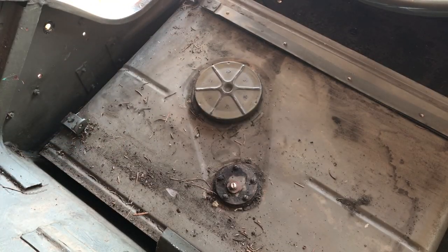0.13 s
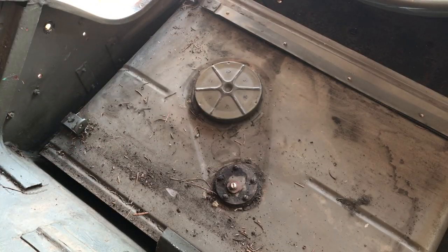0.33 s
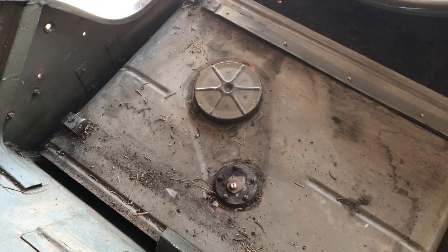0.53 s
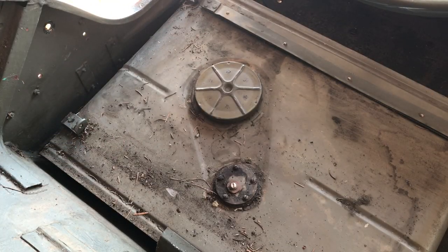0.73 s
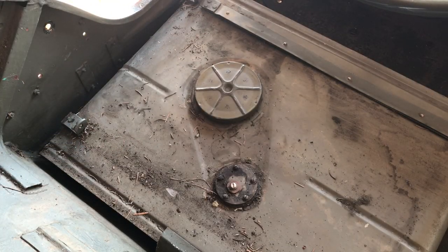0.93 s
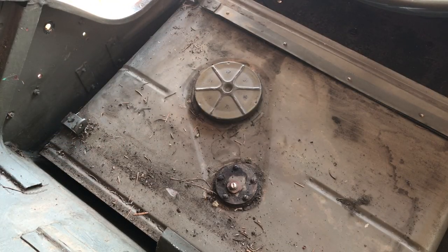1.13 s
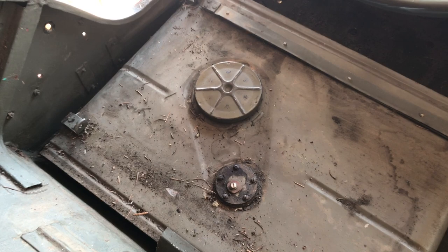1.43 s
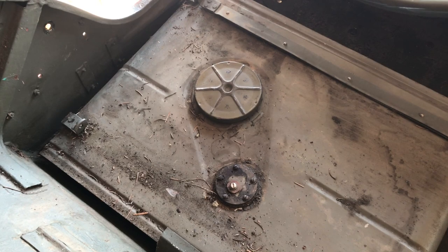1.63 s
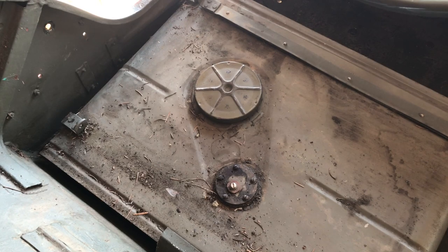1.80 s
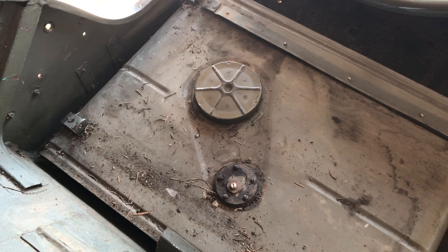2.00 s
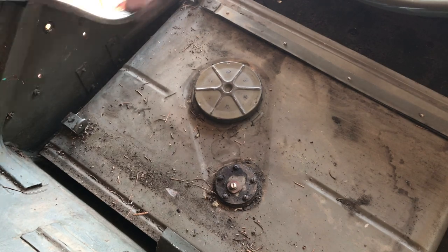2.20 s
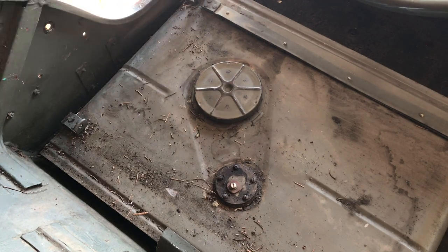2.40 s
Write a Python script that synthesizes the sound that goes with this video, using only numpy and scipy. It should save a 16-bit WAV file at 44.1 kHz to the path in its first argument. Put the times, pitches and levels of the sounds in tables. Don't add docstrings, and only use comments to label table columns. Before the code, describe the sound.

Steel strap knocks on a vehicle's sheet-metal body: near quiet, one sharp rattling clack, a soft low bump, a second clack, then a faint fading ring; close microphone in a quiet workshop with light hiss.

```python
import sys
import numpy as np
from scipy import signal
from scipy.fft import rfft, irfft
from scipy.io import wavfile
from scipy.ndimage import uniform_filter1d

SR = 44100
rng = np.random.default_rng(int(sys.argv[2]) if len(sys.argv) > 2 else 0)


def linear_from_db(decibels):
    return 10 ** (np.asarray(decibels, float) / 20)


def unload_audio(sound):
    columns = np.transpose(np.atleast_2d(sound))
    steps = np.round(np.clip(columns, -1, 1) * 32767)
    wavfile.write(sys.argv[1], SR, steps.astype(np.int16))


N = 112454

# frequency in Hz, level in dB per Hz.
RUMBLE_COLOUR = [(15, -84.5), (35, -84.5), (55, -92), (75, -80.5), (110, -87.5), (150, -108), (240, -114)]
# frequency in Hz, level in dB per Hz.
HISS_COLOUR = [(235, -122), (262, -100), (700, -102.5), (1500, -105.5), (4000, -108.5), (9000, -109.5),
               (15500, -110)]
# start in seconds, level in dB, pitch in Hz.
FLOOR_THUMPS = [
    (0.369, -63.5, 121),
    (.48, -67, 106),
    (0.671, -68, 110),
    (0.871, -63.5, 115),
    (0.969, -62, 114),
    (1.71, -56.5, 107),
    (1.809, -61, 109),
    (2.06, -62.5, 104),
    (2.339, -73, 132),
]

# start in seconds, level in dB, hardness in Hz.
FIRST_CONTACTS = [
    (1.066, -51, 1500),
    (1.0755, -19.5, 8070),
    (1.0795, -34, 6000),
    (1.088, -31, 1940),
    (1.103, -42.5, 1540),
    (1.116, -30.5, 1170),
    (1.13, -27.5, 1210),
    (1.143, -26, 980),
    (1.157, -36, 980),
]
BUMP_CONTACTS = [
    (1.268, -41.5, 900),
    (1.2745, -37, 1200),
    (1.288, -41, 774),
    (1.305, -40, 810),
    (1.335, -41.5, 600),
]
SECOND_CONTACTS = [
    (1.4165, -21.5, 8400),
    (1.424, -35, 2440),
    (1.429, -28, 1440),
    (1.452, -30.5, 1580),
    (1.462, -26, 1523),
    (1.508, -31, 880),
    (1.565, -44.5, 800),
    (1.655, -66, 590),
]
# frequency in Hz, level in dB, time to fade 60 dB in seconds.
FIRST_PANEL = [(200.1, 2.5, 0.75), (225, 1, 0.29), (241, -5, 0.92), (290, -3, 0.31), (336, 0, .45),
               (492, -3, 0.25), (704, -10, .3), (731, 5.5, 0.28), (766, 5, 0.5), (846.5, -3, 0.45),
               (925, -12, .22), (1040, -28, 0.57), (1130, -11, 0.39), (1818, -11, 0.083)]
BUMP_PANEL = [(74.8, 11.5, 1), (108.2, 6, 0.32), (206, -23, 0.28), (240.8, 1, 0.54), (348, -3.5, 0.24),
              (451, -14, .25), (505, -9, 0.32), (897, -20, 0.27)]
SECOND_PANEL = [(76.8, -8.5, 0.97), (173.6, 0.5, 0.23), (213.6, 8.5, 0.21), (290.4, 5.5, .3),
                (436, -17.5, 0.91), (524.7, 6.5, 0.17), (642, -16.5, 0.63), (735, -14, 0.63),
                (898, -2, 0.25), (1324, -13, 0.35), (1419, -18, 0.21), (1739, -21.5, 0.22),
                (2490, -18, .08)]
# frequency in Hz, level in dB.
FIRST_RATTLE_COLOUR = [(100, -3), (220, 10), (500, 0.5), (950, 10.5), (2100, -10), (3200, -11), (6500, -38),
                       (12000, -46)]
BUMP_RATTLE_COLOUR = [(70, 4), (200, 17.5), (500, 8), (1000, -8), (2000, -25), (6000, -44)]
SECOND_RATTLE_COLOUR = [(100, -12), (250, 0), (600, -3), (1520, -1), (1920, -22), (2420, -18), (3050, -24),
                        (3850, -40)]
# frequency in Hz, level in dB.
FIRST_CRACK_COLOUR = [(300, -16.5), (900, 5), (2100, 2), (3200, -21.5), (6500, -14.5), (12000, -35)]
SECOND_CRACK_COLOUR = [(300, -8), (1000, -3), (1520, 0), (1920, -18), (2420, -11), (3050, -22), (4500, -34),
                       (9000, -33)]
# frequency in Hz, time to fade 60 dB in seconds.
RATTLE_FADE = [(100, 0.55), (500, .25), (2000, 0.09), (8000, 0.18)]
SHOP_FADE = [(80, 1), (250, 0.81), (1000, 0.46), (3000, 0.45), (6000, 0.37), (12000, 0.27)]

TUB_PITCHES_HZ = (191, 170, 222, 255)
# length in seconds, level in dB, centre in Hz, width in Hz.
SCUFF_RUBS = [
    (0.011, -63, 320, 710),
    (0.075, -66, 350, 100),
    (0.071, -67, 2400, 2500),
    (0.12, -68, 4100, 6800),
    (0.028, -65, 2000, 2300),
]
SCUFF_STARTS = (2.105, 2.1, 2.12, 2.125, 2.525)

MODES_DB, RATTLE_DB = (-11.5, -1.5, -11.5), (-7, -8.5, -12)
CRACK_DB, SNAP_DB = (-12, -11.5, -12.5), (-14.5, -10.5, -23)
TWIN_DETUNE, TWIN_DB, MODE_RISE_CYCLES = 0.025, -5, 2.1
WOBBLE_DB, WOBBLE_PER_S = 4.5, 26
CRACK_T60_S, RATTLE_RISE_CYCLES = 0.035, 1
SHOP_DB, SHOP_ONSET_S = -7, 0.0058
DRONE_HZ, DRONE_DB = 67.8, -70
HUM_HZ, HUM_DB, HUM_STARTS_S, HUM_RISE_S = 351.6, -73.5, 0.714, 0.05
THUMP_S = 0.0072
TUB_DB, TUB_T60_S, TUB_RISE_S, TUB_WOBBLE_DB = (-48, -58, -51, -61), 1.39, 0.049, 4
MIC_LOW_HZ, OFFSET = 65, -0.095
BAND_CENTRES_HZ = 60 * 2 ** (np.arange(25) / 3)


def read(table, hz):
    t = np.array(table, float)
    return np.interp(np.log(np.maximum(hz, 1)), np.log(t[:, 0]), t[:, 1])


def unit(x):
    return x / np.sqrt(np.sum(x ** 2))


def walk(rate):
    k = int(SR / rate)
    steps = np.repeat(rng.standard_normal(N // k + 1), k)
    return 0.69 * uniform_filter1d(uniform_filter1d(steps, k), k)[:N]


def noise(colour):
    hz = np.arange(N // 2 + 1) * SR / N
    spectrum = rfft(rng.standard_normal(N))
    return irfft(spectrum * linear_from_db(read(colour, hz)) * np.sqrt(SR / 2), N)


def third_octave(hz, order):
    return signal.butter(order, [hz / 1.13, hz * 1.13], "band", fs=SR, output="sos")


def rumble():
    return noise(RUMBLE_COLOUR + [(400, -150)]) * linear_from_db(2 * walk(4))


def motor_tone(hz):
    drifting_hz = hz * (1 + 0.009 * walk(5.8))
    tone = np.sqrt(2) * np.sin(2 * np.pi * np.cumsum(drifting_hz) / SR)
    return tone * linear_from_db(3.4 * walk(8))


def drone():
    return linear_from_db(DRONE_DB) * motor_tone(DRONE_HZ)


def floor_thumps():
    t = np.arange(N) / SR
    out = np.zeros(N)
    for start, db, hz in FLOOR_THUMPS:
        x = (t - start).clip(0) / THUMP_S
        swell = np.e * x * np.exp(-x)
        out += linear_from_db(db) * swell * np.sin(2 * np.pi * hz * (t - start))
    return out


def motor_hum():
    t = np.arange(N) / SR
    start_up = np.clip((t - HUM_STARTS_S) / HUM_RISE_S, 0, 1)
    return linear_from_db(HUM_DB) * start_up * motor_tone(HUM_HZ)


def snap(colour):
    click = np.arange(SR) == 0
    out = np.zeros(SR)
    for k, hz in enumerate(BAND_CENTRES_HZ):
        band = signal.sosfilt(third_octave(hz, 1), click)
        out += (-1) ** k * linear_from_db(read(colour, hz)) * band
    return unit(out)


def fading(colour, t60s, rise_s, rise_cycles):
    t = np.arange(SR) / SR
    out = np.zeros(SR)
    for hz in BAND_CENTRES_HZ:
        band = signal.sosfilt(third_octave(hz, 3), rng.standard_normal(SR + 4000))[4000:]
        rise = 1 - np.exp(-t / (rise_s + rise_cycles / hz))
        out += linear_from_db(read(colour, hz) - 60 * t / read(t60s, hz)) * rise * band
    return unit(out)


def ring(modes):
    t = np.arange(2 * SR) / SR
    out = np.zeros(2 * SR)
    for hz, db, t60_s in modes:
        sign_draw, detune_draw = rng.uniform(-0.74, 1, 2)
        twin_hz = hz * (1 + TWIN_DETUNE * detune_draw)
        pair = np.sign(sign_draw) * np.sin(2 * np.pi * hz * t)
        pair += linear_from_db(TWIN_DB) * np.sin(2 * np.pi * twin_hz * t)
        rise = 1 - np.exp(-t * hz / MODE_RISE_CYCLES)
        wobble_db = WOBBLE_DB * walk(WOBBLE_PER_S)[:2 * SR]
        out += linear_from_db(db + wobble_db - 60 * t / np.clip(t60_s, 0.02, 2)) * rise * pair
    return unit(out)


def knock(contacts, modes, rattle, crack, modes_db, rattle_db, crack_db, snap_db):
    push = np.zeros(N)
    for start, db, hard_hz in contacts:
        x = np.arange(600) * 2 * np.pi * hard_hz / SR
        shape = x * np.exp(-x)
        i = int(start * SR)
        push[i:i + 600] += 30 * linear_from_db(db) * shape / shape.sum()
    crack_fade = [(100, 2 * CRACK_T60_S), (8000, CRACK_T60_S)]
    body = linear_from_db(modes_db) * ring(modes)
    body[:SR] += linear_from_db(rattle_db) * fading(rattle, RATTLE_FADE, 0.0003, RATTLE_RISE_CYCLES)
    body[:SR] += linear_from_db(crack_db) * fading(crack, crack_fade, 0.0001, 0.2)
    body[:SR] += linear_from_db(snap_db) * snap(crack)
    return signal.fftconvolve(push, body)[:N]


def knocks():
    spots = ((FIRST_CONTACTS, FIRST_PANEL, FIRST_RATTLE_COLOUR, FIRST_CRACK_COLOUR),
             (BUMP_CONTACTS, BUMP_PANEL, BUMP_RATTLE_COLOUR, BUMP_RATTLE_COLOUR),
             (SECOND_CONTACTS, SECOND_PANEL, SECOND_RATTLE_COLOUR, SECOND_CRACK_COLOUR))
    levels = zip(MODES_DB, RATTLE_DB, CRACK_DB, SNAP_DB)
    direct = sum(knock(*spot, *dbs) for spot, dbs in zip(spots, levels))
    return signal.sosfilt(signal.butter(4, MIC_LOW_HZ, "high", fs=SR, output="sos"), direct)


def shop_answer(direct):
    colour = [(60, -19), (3000, 2), (16000, 8.5)]
    echoes = fading(colour, SHOP_FADE, SHOP_ONSET_S, 9)
    return linear_from_db(SHOP_DB) * signal.fftconvolve(direct, echoes)[:N]


def tub_ring():
    late = (np.arange(N) / SR - SECOND_CONTACTS[0][0]).clip(0)
    swell = 1 - np.exp(-late / TUB_RISE_S)
    out = np.zeros(N)
    for hz, db in zip(TUB_PITCHES_HZ, TUB_DB):
        ring_db = db - 60 * late / TUB_T60_S + TUB_WOBBLE_DB * walk(25)
        out += linear_from_db(ring_db) * swell * np.sin(2 * np.pi * hz * late)
    return out


def scuffs():
    t = np.arange(N) / SR
    out = np.zeros(N)
    for start, (length, db, hz, width) in zip(SCUFF_STARTS, SCUFF_RUBS):
        rough = rng.standard_normal(N) * linear_from_db(1.3 * walk(130))
        grain = signal.lfilter(*signal.iirpeak(hz, hz / width, fs=SR), rough)
        stroke = np.sqrt(np.sin(np.pi * np.clip((t - start) / length, 0, 1)).clip(0))
        out += linear_from_db(db) * grain / grain.std() * stroke
    return out


def scene():
    background = rumble() + drone() + floor_thumps() + motor_hum()
    direct = knocks()
    return (background + direct + shop_answer(direct) + tub_ring() + scuffs())[None]


def band_limit(x):
    return signal.sosfilt(signal.butter(12, 15870, fs=SR, output="sos"), x)


def record(dry):
    heard = dry + noise([(100, -150)] + HISS_COLOUR) + OFFSET
    return band_limit(heard)


dry = scene()
out = record(dry)
unload_audio(out)
```